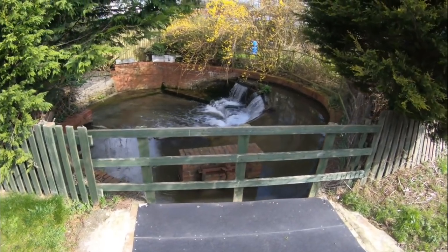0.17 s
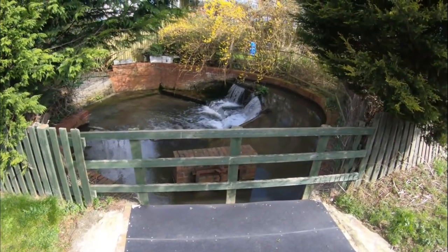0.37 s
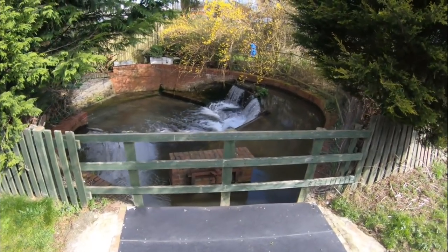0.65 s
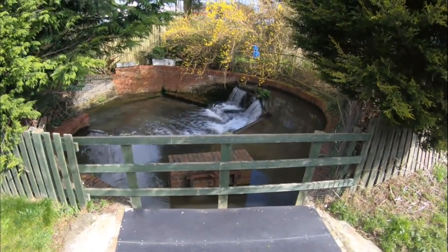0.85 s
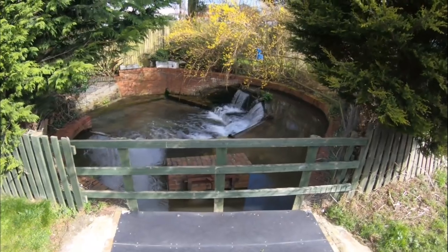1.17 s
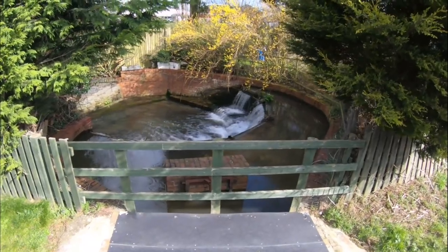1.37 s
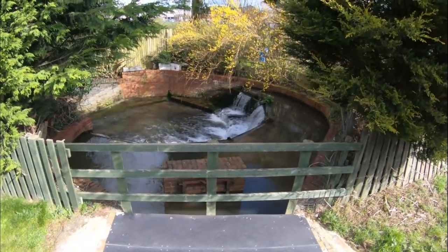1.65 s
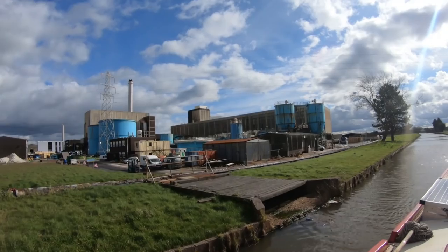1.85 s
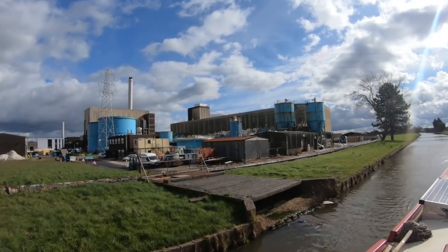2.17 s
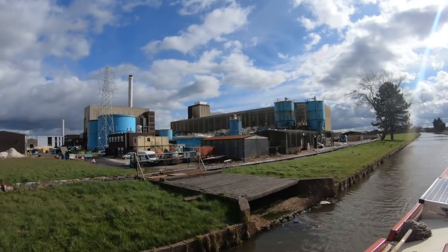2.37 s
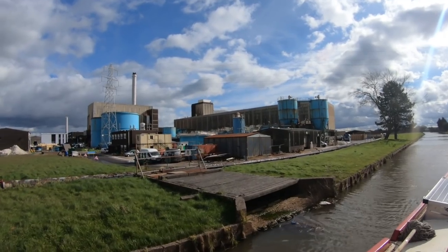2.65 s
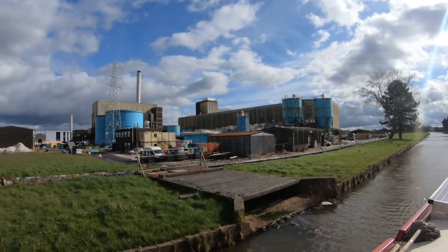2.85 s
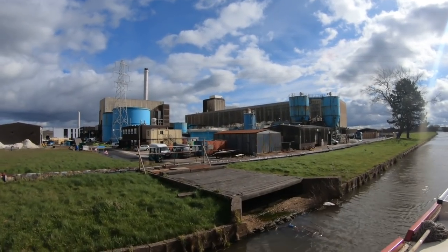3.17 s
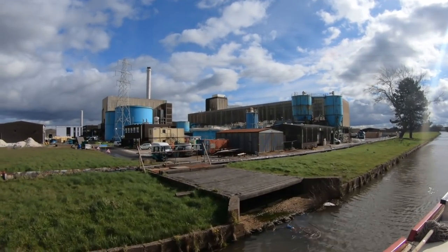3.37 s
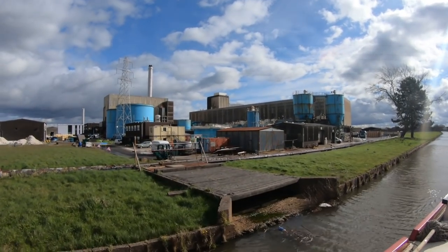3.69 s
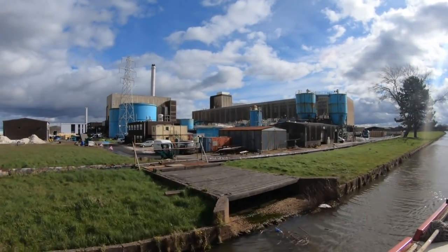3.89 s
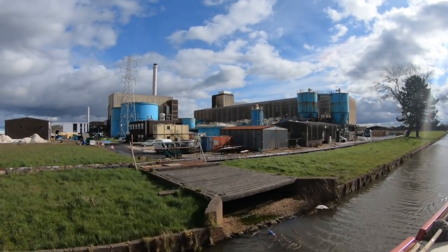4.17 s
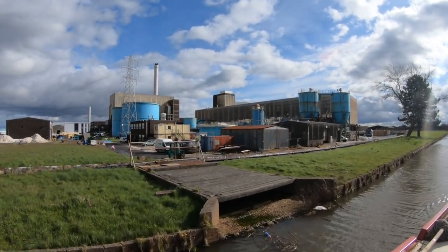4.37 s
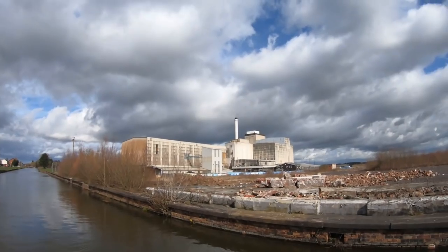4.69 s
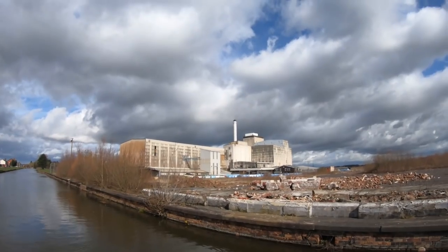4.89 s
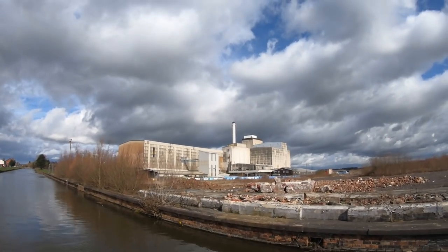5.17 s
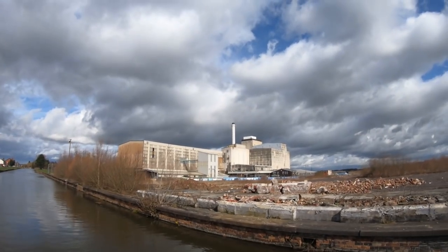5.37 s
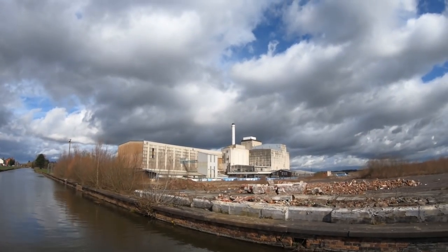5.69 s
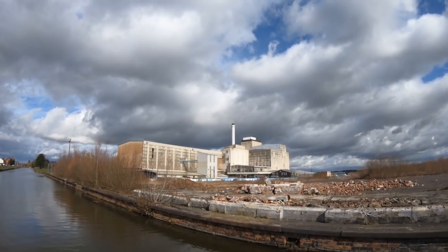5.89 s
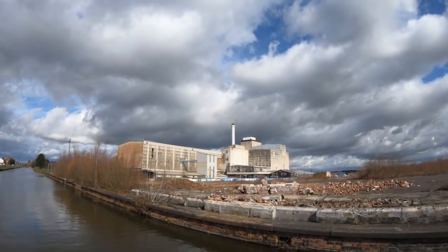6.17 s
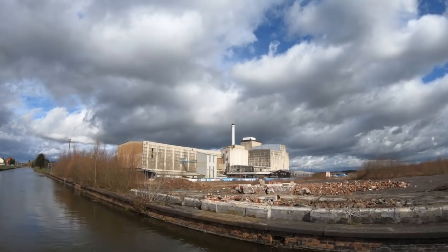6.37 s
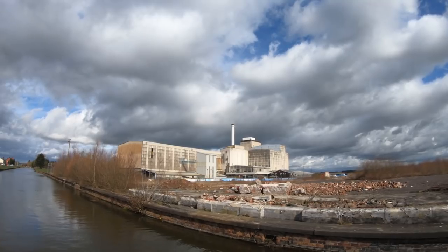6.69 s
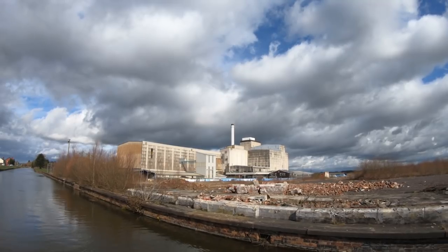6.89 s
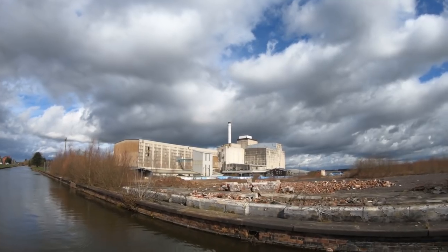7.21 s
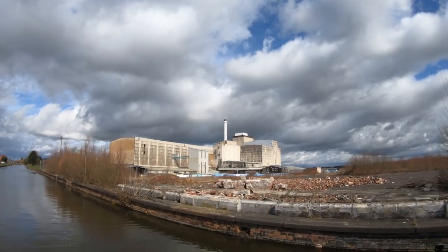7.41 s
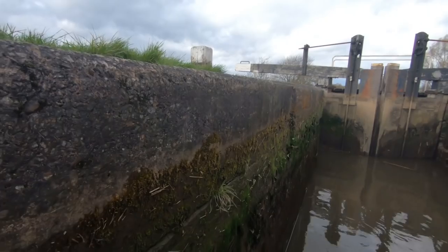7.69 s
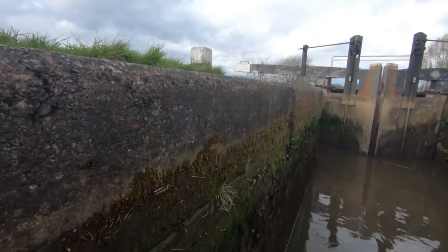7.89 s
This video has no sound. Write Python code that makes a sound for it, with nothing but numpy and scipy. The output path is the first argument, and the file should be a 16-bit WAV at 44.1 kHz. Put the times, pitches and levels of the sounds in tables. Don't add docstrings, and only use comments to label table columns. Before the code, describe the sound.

Four abruptly joined moments of a small canal boat, heard by a handheld camera microphone. First, steady diesel hum with thin mid-high metal squeaks in the opening second and light wind puffs. Next, two stretches under way: a slightly quicker throb, light knocking, faint hull water and sparse drips, repeatedly swamped by low buffeting gusts. Last, a bump of pressure and the engine drops to a slow, lumpy idle with little wind.

```python
import sys
import numpy as np
from scipy import signal
from scipy.fft import rfft, irfft, next_fast_len
from scipy.io import wavfile
from scipy.ndimage import uniform_filter1d, map_coordinates

SR = 44100
rng = np.random.default_rng(int(sys.argv[2]) if len(sys.argv) > 2 else 0)


def voltage_ratio(decibels):
    exponent = np.asarray(decibels, float) / 20
    return 10 ** exponent


def materialize(psi):
    bounded = np.clip(np.atleast_2d(psi).T, -1, 1)
    quanta = np.round(bounded * 32767).astype(np.int16)
    wavfile.write(sys.argv[1], SR, quanta)


N = 355005
PLACES = 4

# throb/dB, hull drone re throb/dB, clatter/dB, wash/dB, breeze/dB
LEVELS = [(-23, -21.5, -34, -45.5, -56), (-20.5, -20, -36, -46, -32), (-20, -17, -34, -51, -31),
          (-20, -20.5, -43, -51.5, -55)]


def unit(x):
    return x / np.sqrt(np.mean(x ** 2) + 1e-20)


def along(points, hz):
    f, v = np.transpose(points)
    return np.interp(np.log(hz + 1), np.log(f + 1), v)


def wobble(n, rate_hz):
    knots = rng.standard_normal(int(n * rate_hz / SR) + 4)
    steps = map_coordinates(knots, [np.arange(n // 32 + 2) * 32 * rate_hz / SR])
    return np.interp(np.arange(n) / 32, np.arange(len(steps)), steps)


def coloured(x, gain_db):
    m = 2 * next_fast_len(min(len(x), SR // 2) + len(x) // 2)
    log_gain = np.maximum(gain_db(np.fft.rfftfreq(m, 1 / SR)), -120) * np.log(10) / 20
    cep = irfft(log_gain, m)
    cep[1:m // 2] *= 2
    cep[m // 2 + 1:] = 0
    return unit(irfft(rfft(x, m) * np.exp(rfft(cep)), m)[:len(x)])


def wind(n):
    # f/Hz, density/dB per Hz
    buffet = [(2, -2), (8, 5), (16, -3.5), (30, -12.5), (60, -22), (120, -34.5), (250, -34.5), (700, -82.5)]
    x = voltage_ratio(1.6 * wobble(n, 6.4)) * rng.standard_normal(n)
    x = coloured(x, lambda hz: along(buffet, hz))
    power = uniform_filter1d(uniform_filter1d(x ** 2, SR // 5), SR // 10)
    return unit(x / np.sqrt(abs(power) + 0.14))


def gusts(i, t):
    # t/s, peak/dB, time to die by 10 dB/s
    gust_lists = [
        [(.59, -31, .13), (1.162, -27, .08), (1.46, -35, .05), (1.6, -37, .4)],
        [(2.34, -23.5, .1), (2.6, -20.5, .27), (3.01, -18, .1), (3.2, -25, .1), (3.5, -22.5, .2),
         (3.8, -27, .4), (4.05, -27, .2), (4.23, -22.5, .22), (4.46, -25, .1)],
        [(4.5, -18.5, .55), (5.22, -22.5, .3), (6.05, -27, .2), (6.21, -21, .1), (6.4, -16.5, .08),
         (6.55, -24.5, .9), (6.95, -20.5, .12), (7.18, -23.5, .12), (7.4, -28, .15), (7.58, -17.5, .17)],
        [(7.66, -17, .03), (7.99, -27, .03)],
    ]
    rise_over_fall = 0.63
    held_db, deepest_db, memory_s = -21, -4.5, 0.26
    s, db, dies_s = np.transpose(gust_lists[i])[:, :, None]
    lead_n = SR // 2
    t = np.concatenate([t[0] - np.arange(lead_n, 0, -1) / SR, t])
    fade = np.maximum((t - s) / dies_s, (s - t) / (rise_over_fall * dies_s))
    power = voltage_ratio(2 * LEVELS[i][-1]) + voltage_ratio(2 * db - 20 * fade).sum(0)
    decay = np.exp(-1 / (memory_s * SR))
    heard = signal.lfilter([1 - decay], [1, -decay], power)
    left = 1 - heard / voltage_ratio(2 * held_db)
    duck_db = 10 * np.log10(np.maximum(left, voltage_ratio(2 * deepest_db)))
    return 10 * np.log10(power[lead_n:]), duck_db[lead_n:]


def wash(i, n):
    # f/Hz, density/dB per Hz
    wash_colours = [
        [(880, -30), (1500, -9), (1670, -28), (2010, -22), (2750, 1.5), (8670, -3.5), (15600, -20.5)],
        [(880, -24), (1500, 6), (3250, -15), (3590, -7), (6650, -10.5), (9280, -19), (15600, -50)],
        [(880, -2), (1500, -9), (2110, -16), (4360, -6), (5310, -14), (9750, -59), (15600, -58)],
        [(880, -22), (1500, -4), (1860, -5), (2570, -13.5), (7340, -17), (15600, -41)],
    ]
    spray_rates = [0, 40, 0, 0]
    sparkle = voltage_ratio(1.53 * wobble(n, 12.053) + 1.0 * wobble(n, 200))
    specks = (rng.random(n) < spray_rates[i] / SR) * rng.uniform(.2, 1.6, n)
    sparkle += np.convolve(specks, np.hanning(120), "same")
    return coloured(sparkle * rng.standard_normal(n), lambda hz: along(wash_colours[i], hz))


def drops():
    # t/s, peak/dB, centre f/Hz, width/Hz
    drop_events = [(0.084, -17.5, 4000, 9000), (2.158, -36, 8000, 6000), (2.375, -46, 12000, 6000),
                   (2.412, -45, 13000, 3000), (2.44, -51, 11500, 3000), (2.56, -33, 6540, 2500),
                   (2.635, -36, 7000, 5000), (2.655, -37, 5000, 3000), (2.728, -39.5, 7800, 3000),
                   (2.808, -52, 10800, 1500), (2.83, -51, 11500, 2500), (2.997, -35, 5000, 3000),
                   (3.016, -35, 5600, 2500), (3.152, -33.5, 5500, 4000), (3.382, -33, 5000, 4000),
                   (3.974, -37, 5000, 4000)]
    x, t = np.zeros(N), np.arange(512) / SR
    for s, db, hz, width_hz in drop_events:
        puff = voltage_ratio(-60 * t / 0.0128) * rng.standard_normal(len(t))
        tick = coloured(puff, lambda f: -12 * ((f - hz) / width_hz * 2) ** 2)
        x[round(s * SR):][:len(t)] += voltage_ratio(db) * tick / abs(tick).max()
    return x


def squeak():
    # t/s, length/s, f/Hz, level/dB, extra level at the bite/dB
    strokes = [
        (.163, .165, 1612, -32, 7.5),
        (.425, .01, 1588, -33, 0),
        (.548, .016, 1595, -39, 0),
        (.612, .11, 1612, -33, 12),
    ]
    # multiple, level at full bite/dB
    overtones = [(2, -19), (3, -21), (4, -26), (5, -37), (6, -44)]
    # t/s, length/s, f/Hz, level/dB
    chirp_events = [
        (0.059, 0.007, 6866, -37),
        (0.12, 0.011, 8567, -45),
    ]
    rise_db_s, fall_db_s, sag_hz_s, sag_db_s = 700, 800, 100, 22
    bite_at, bite_rise_s, bite_fall_s = .36, 0.01, 0.023
    bite_hz_per_db, grate_lag_s, grate_bite_db = .8, .004, 7

    t = np.arange(SR) / SR
    s, span_s, hz, db, bite_db = np.transpose(strokes)[:, :, None]
    late = t - s - bite_at * span_s
    bite_width_s = np.where(late < 0, bite_rise_s, bite_fall_s)
    bite_db = bite_db * np.exp(-.5 * (late / bite_width_s) ** 2)
    db = db + bite_db - sag_db_s * late
    db = db - rise_db_s * np.maximum(s - t, 0) - fall_db_s * np.maximum(t - s - span_s, 0)
    bite_db = bite_db.max(0)

    stroke = db.argmax(0)
    pitch_hz = hz[stroke, 0] - sag_hz_s * (t - s[stroke, 0])
    pitch_hz = pitch_hz + bite_hz_per_db * bite_db + 7 * wobble(SR, 70)
    phase = 2 * np.pi * np.cumsum(pitch_hz) / SR
    level = voltage_ratio(db.max(0) + 1.6 * wobble(SR, 80))
    force = np.roll(np.minimum(bite_db / grate_bite_db, 1), round(grate_lag_s * SR))
    tones = np.sin(phase)
    for k, tone_db in overtones:
        tones += voltage_ratio(tone_db + 2.5 * wobble(SR, 57.8)) * force ** 1.5 * np.sin(k * phase)
    x = level * tones
    for at, length_s, f, chirp_db in chirp_events:
        x += voltage_ratio(chirp_db) * np.exp(-.5 * ((t - at) / length_s) ** 2) * np.sin(2 * np.pi * f * t)
    return np.pad(np.sqrt(2) * x, (0, N - SR))


def drone(n):
    # f/Hz, density/dB per Hz
    plates = [(18, -19), (38, 3.5), (60, -9.5), (100, -5.5), (160, -10), (330, -18), (700, -36.5),
              (2000, -94)]
    return coloured(rng.standard_normal(n), lambda hz: along(plates, hz))


def clatter(i, crank):
    # f/Hz, width/Hz, level over the broad colour/dB
    block_modes = [
        [(459, 22, 6), (1014, 38, 9), (1470, 79, 7), (1995, 94, 10), (2405, 100, 4.5)],
        [(206, 18, 0.5), (468, 70, 3), (788, 95, 3), (1045, 40.2, 6), (3210, 150, 4)],
        [(480, 43.5, 11), (803, 110, 3.5), (2430, 160, 0.5), (1031, 42, 9), (1500, 66, 7.5), (2960, 220, 4.5),
         (4060, 210, 6), (4356, 54, 8.5), (6330, 230, 4)],
        [(445, 51, 16.5), (940, 130, 9), (1810, 76, 8.5)],
    ]
    # f/Hz, density/dB per Hz
    clatter_colours = [
        [(100, 4.5), (170, -3), (320, -4.5), (700, -3.5), (2000, -8), (4000, -17.5), (9000, -35), (15500, -43)],
        [(100, -19), (200, -4.5), (330, -10.5), (600, -8.5), (2000, -11), (4000, -22.5), (8000, -37.5),
         (15500, -52.5)],
        [(260, -16.5), (335, -13.5), (430, -12), (1500, -8), (3000, -16), (5500, -26.5), (9500, -32),
         (15500, -46.5)],
        [(100, -28), (200, -26), (330, -20), (520, -11.5), (1800, -19.5), (4000, -26.5), (15500, -48)],
    ]
    # knock delay/firings, length/firings, valve tick delay/firings, tick/dB
    knock_timing = [(0.06, 0.04, 0.65, -2.5), (0.36, 0.14, 0.52, -3), (.35, 0.07, .65, -5.5),
                    (0.2, 0.18, .4, -9)]
    # steady part/dB, scatter/dB, ring scatter/dB
    evenness = [(-3.5, .5, 8.5), (0, 3, 1.5), (-11.5, 1.6, 2.5), (-1, 6, 2)]
    knock, length, tick, tick_db = knock_timing[i]
    steady_db, scatter_db, ring_db = evenness[i]

    bursts = []
    for delay, db in ((knock, 0), (knock + tick, tick_db)):
        firing = np.round(crank - delay)
        shape = voltage_ratio(db) * np.exp(-.5 * ((crank - delay - firing) / length) ** 2)
        bursts.append((firing.astype(int) + 1, shape))

    def rattle(spread_db, between_db):
        sizes = voltage_ratio(spread_db * rng.uniform(-2.6, 1.8, (2, int(crank[-1]) + 3)))
        gate = voltage_ratio(between_db + 0.44 * wobble(len(crank), 24.77))
        for hit_sizes, (k, shape) in zip(sizes, bursts):
            gate += hit_sizes[k] * shape
        return unit(gate * rng.standard_normal(len(crank)))

    def band(kind, hz, noise):
        return signal.lfilter(*signal.butter(2, hz, kind, fs=SR), noise)

    x = band("low", 1000, rattle(scatter_db, steady_db + 24.0))
    x += band("high", 1000, rattle(scatter_db, steady_db + 0.5))
    x += voltage_ratio(-3) * band("high", 7000, rattle(3.2 * scatter_db, steady_db - 9))
    for hz, width_hz, db in block_modes[i]:
        strike = rattle(ring_db, steady_db + 4 * np.log2(1500 / hz))
        x += voltage_ratio(db) * signal.lfilter(*signal.iirpeak(hz, hz / width_hz, SR), strike)
    return coloured(x, lambda hz: along(clatter_colours[i], hz))


def throb(i, crank, skew_rad, dispersion_rad):
    # multiple of the three-firing cycle, level/dB
    exhaust_lines = [
        [(2, -20.5), (4, -24.7), (6, 0), (9, -1.4), (10, -30), (12, -11.9), (13, -28), (15, -20.7), (16, -25),
         (17, -29.7), (33, -25), (36, -24), (39, -25.3), (83, -31.4)],
        [(3, -4), (4, -22), (6, 0), (7, -28), (9, -7.3), (10, -26.5), (12, -19.7), (13, -30.3), (15, -27.8),
         (16, -20.9), (17, -22.2), (33, -25.9), (36, -27.8), (38, -31.2)],
        [(3, -10), (6, 0), (7, -27), (8, -24.2), (9, -2.4), (10, -24.8), (12, -10.9), (15, -22.3), (17, -26.5),
         (18, -20.9), (19, -27.9), (21, -28), (33, -27.8), (36, -27.2)],
        [(2, -18.7), (3, -1.4), (4, -7.8), (5, -8.1), (6, 0), (7, -2.1), (8, -3.7), (9, -5.2), (10, -9.1),
         (12, -8.4), (14, -16.9), (15, -20.3), (18, -20.1), (51, -24.4)],
    ]
    cylinders = [(0, 1), (.918, 1.18), (2.016, 1.26)]
    late, size = np.transpose(cylinders)
    n, x = len(crank), 0
    for k, db in exhaust_lines[i]:
        order = k / len(cylinders)
        pattern = np.angle(np.sum(size * np.exp(-2j * np.pi * order * late)))
        drift = 0.1 * order * wobble(n, 5.96)
        level = voltage_ratio(db + 0.039 * order + (0.4 + 0.15 * order) * wobble(n, 4.987))
        phase = 2 * np.pi * order * crank + skew_rad + dispersion_rad * order ** 2
        x = x + level * np.cos(phase + pattern + drift)
    return unit(x)


def place(i):
    cuts = [0, 1.7497, 4.47, 7.62948, 8.05]
    # t/s, firing rate/Hz
    speed_points = [
        [(0, 36.059), (.58, 36.182), (1.17, 36.18), (1.75, 36.015)],
        [(1.75, 38.641), (2.29, 38.83), (2.84, 38.784), (3.38, 38.672), (3.93, 38.786), (4.47, 38.712)],
        [(4.47, 38.69), (5.52, 38.652), (6.05, 38.737), (7.1, 38.66), (7.63, 38.689)],
        [(7.63, 26.088)],
    ]
    pulse_shapes = [(.017, -.87, -.9), (.259, -.85, 1.2), (2.319, -1.8, 0), (1.259, 3.1, .285)]
    treble_ducks = [0.8, 0.49, 0.65, 0.39]
    closing_db_s = [1.5, 0.28, 0.38, 0]
    t = np.arange(round(cuts[i] * SR), round(cuts[i + 1] * SR)) / SR
    start, skew_rad, dispersion_rad = pulse_shapes[i]
    crank = start + np.cumsum(np.interp(t, *np.transpose(speed_points[i]))) / SR
    throb_db, drone_db, clatter_db, wash_db, _ = LEVELS[i]
    wind_db, duck_db = gusts(i, t)
    treble_duck_db = treble_ducks[i] * duck_db
    clatter_db = clatter_db + treble_duck_db + closing_db_s[i] * (t - t.mean())

    x = voltage_ratio(wind_db) * wind(len(t))
    x += voltage_ratio(wash_db + treble_duck_db) * wash(i, len(t))
    x += voltage_ratio(clatter_db) * clatter(i, crank)
    engine = throb(i, crank, skew_rad, dispersion_rad) + voltage_ratio(drone_db) * drone(len(t))
    return x + voltage_ratio(throb_db + duck_db) * engine


def scene():
    # t/s, size/full scale
    jumps = [
        (1.7497, -.05),
        (4.47, .02),
        (7.62948, .19),
    ]
    x = np.concatenate([place(i) for i in range(PLACES)] + [np.zeros(9)])[:N]
    x = x + squeak() + drops()
    lead = np.linspace(0, 1, SR // 20) ** 2
    for s, jump in jumps:
        k = round(s * SR)
        x[k - len(lead):k] += (x[k] - x[k - 1] - jump) * lead
    return x[None]


def roll_off(x):
    return signal.sosfilt(signal.butter(12, 15750, fs=SR, output="sos"), x)


def record(dry):
    top_hz = 15750
    m = next_fast_len(N + 8192)
    passed = np.fft.rfftfreq(m, 1 / SR) < top_hz
    mix = irfft(rfft(dry, m) * passed, m)[:, :N]
    return roll_off(mix)


dry = scene()
out = record(dry)
materialize(out)
```